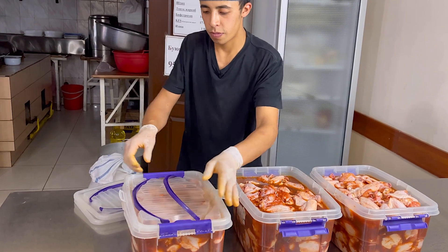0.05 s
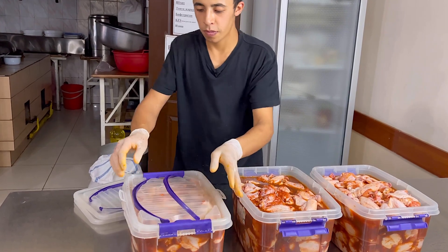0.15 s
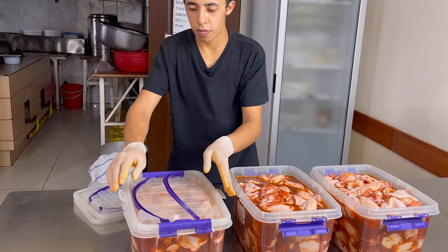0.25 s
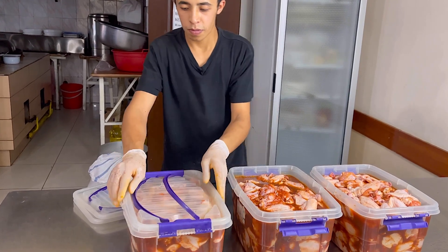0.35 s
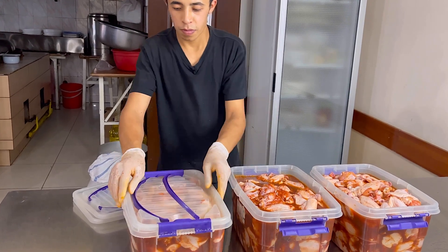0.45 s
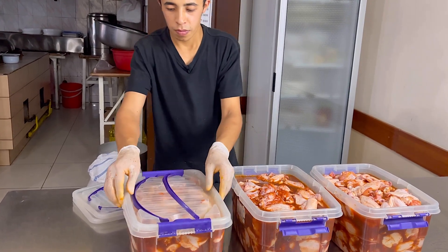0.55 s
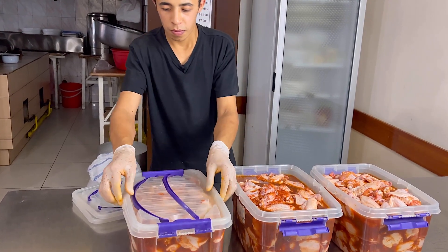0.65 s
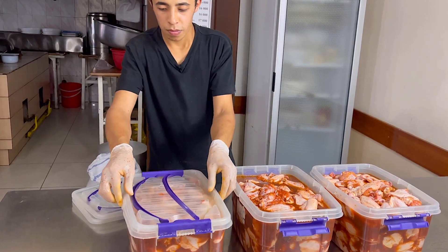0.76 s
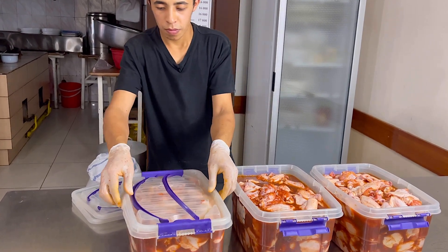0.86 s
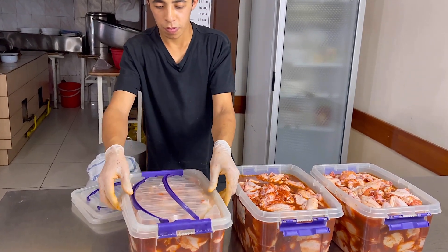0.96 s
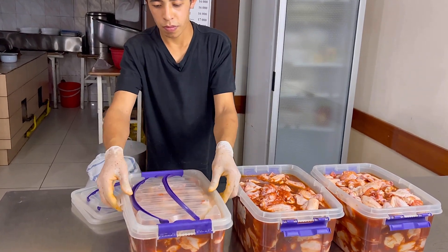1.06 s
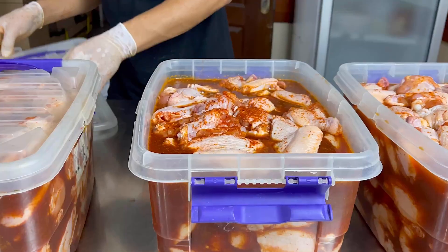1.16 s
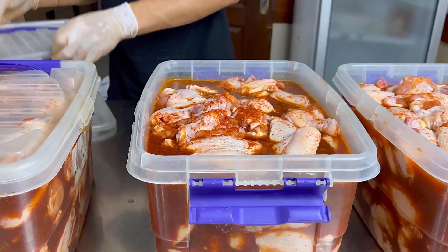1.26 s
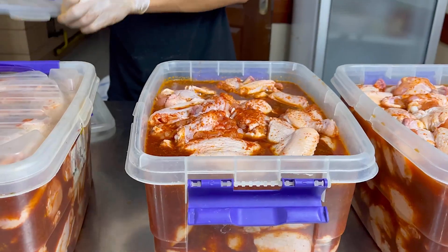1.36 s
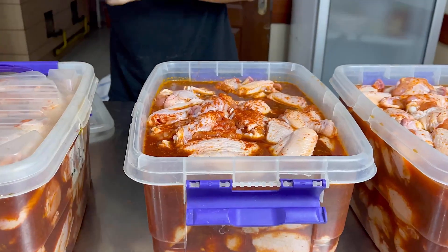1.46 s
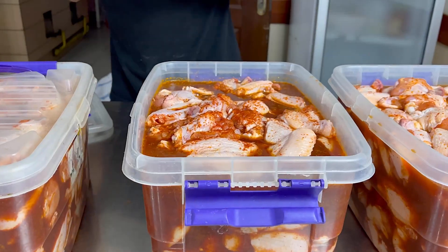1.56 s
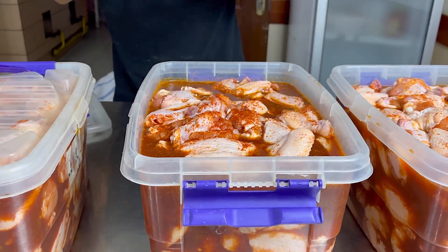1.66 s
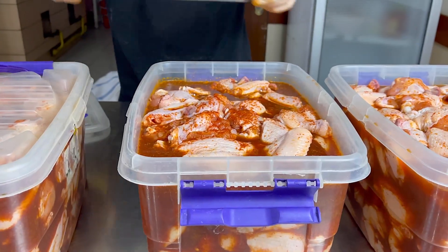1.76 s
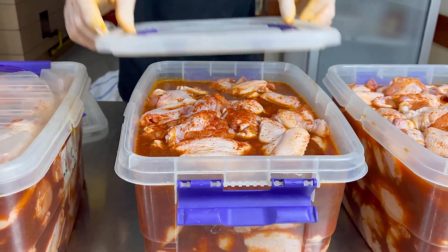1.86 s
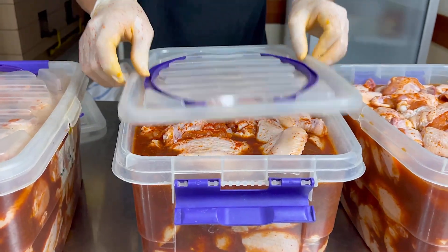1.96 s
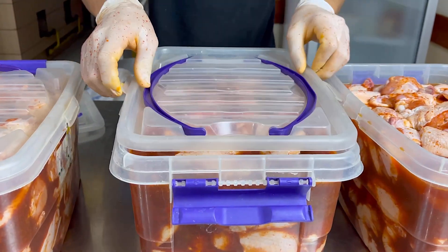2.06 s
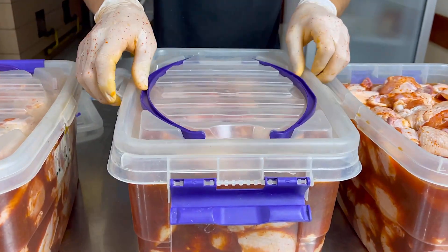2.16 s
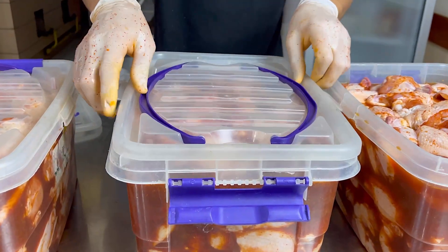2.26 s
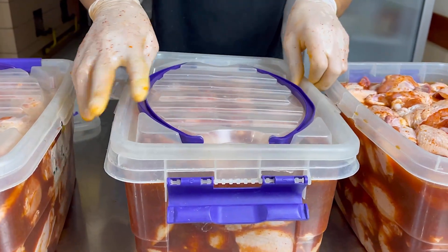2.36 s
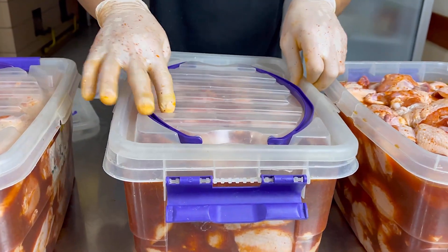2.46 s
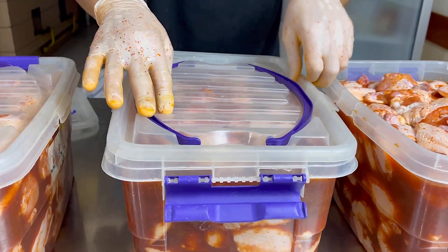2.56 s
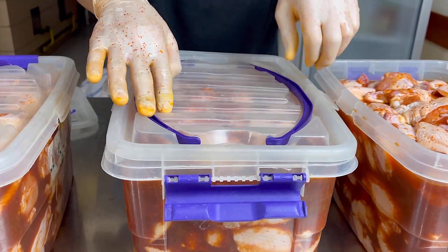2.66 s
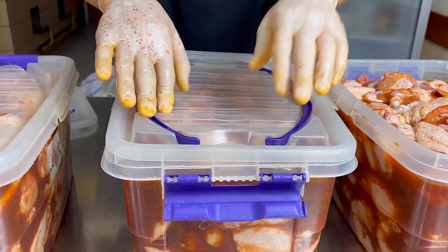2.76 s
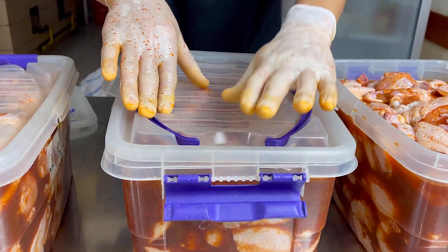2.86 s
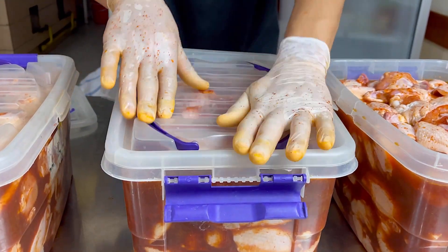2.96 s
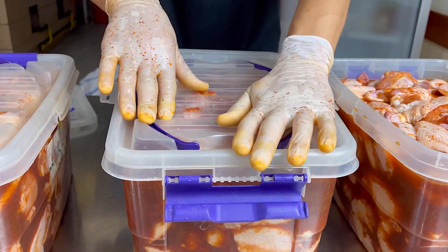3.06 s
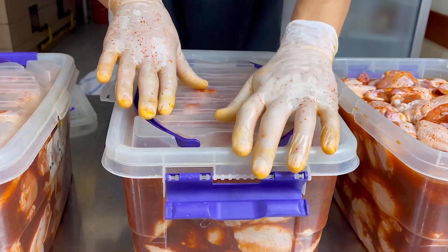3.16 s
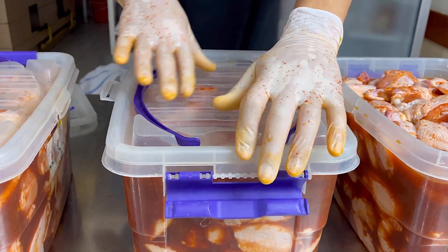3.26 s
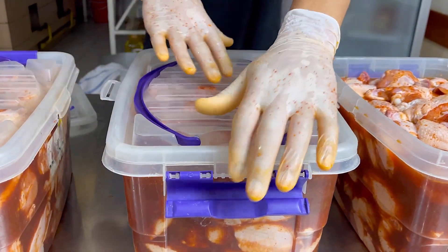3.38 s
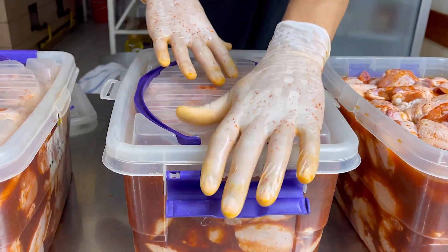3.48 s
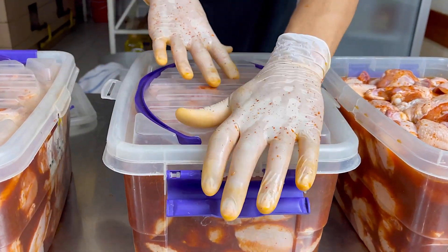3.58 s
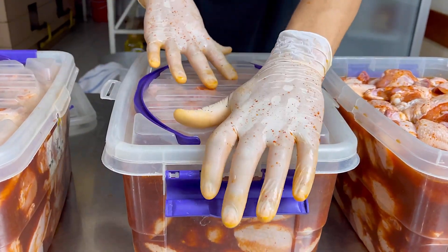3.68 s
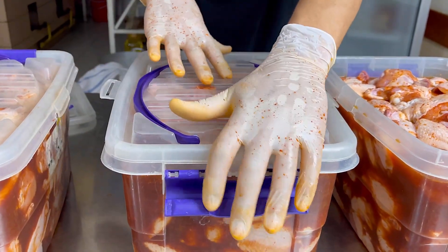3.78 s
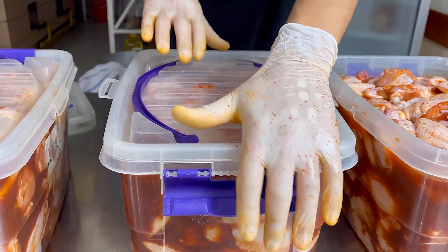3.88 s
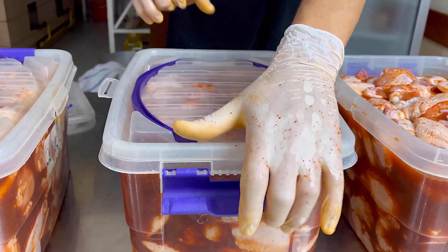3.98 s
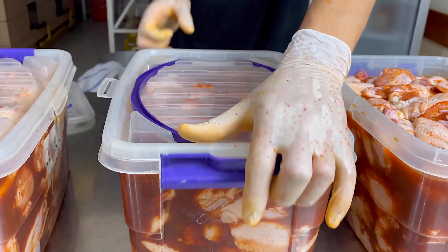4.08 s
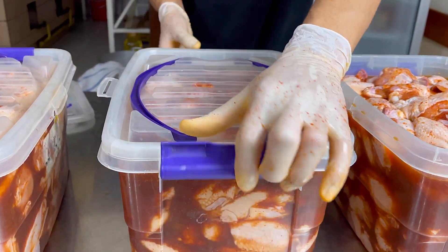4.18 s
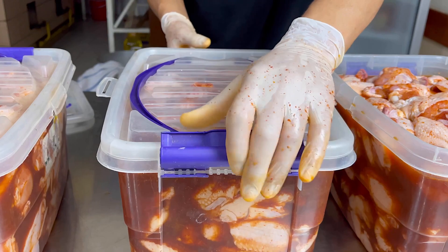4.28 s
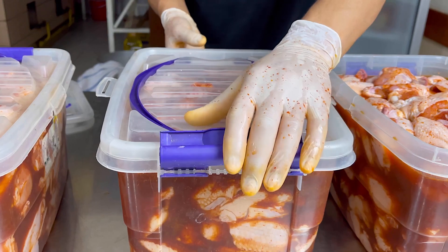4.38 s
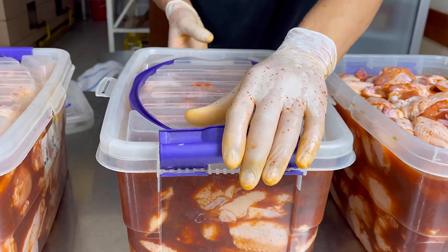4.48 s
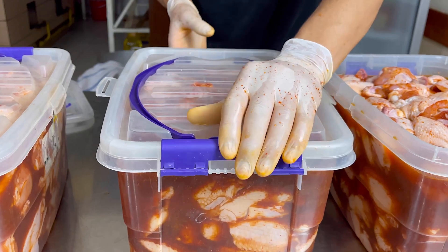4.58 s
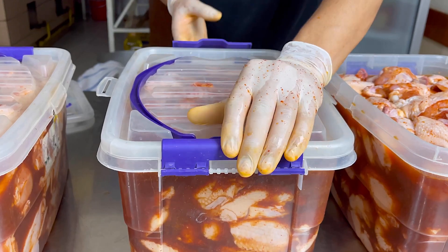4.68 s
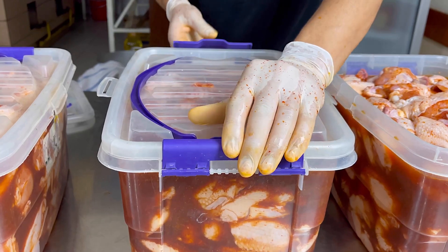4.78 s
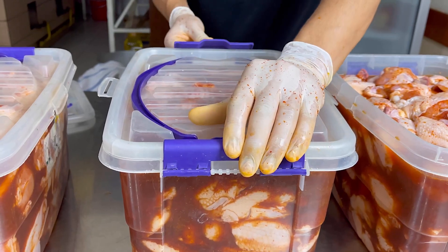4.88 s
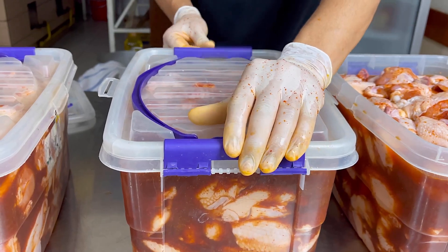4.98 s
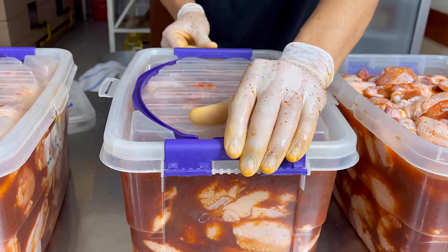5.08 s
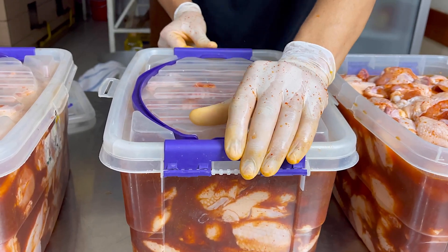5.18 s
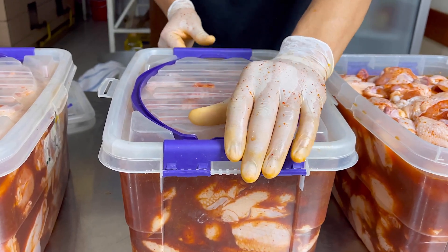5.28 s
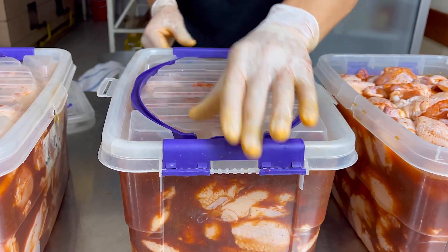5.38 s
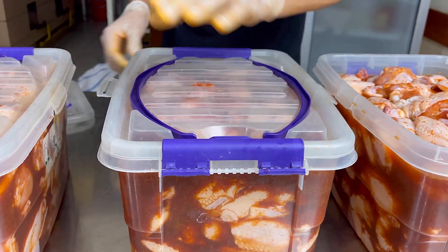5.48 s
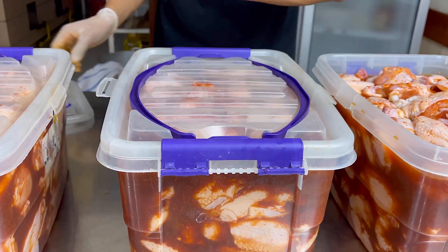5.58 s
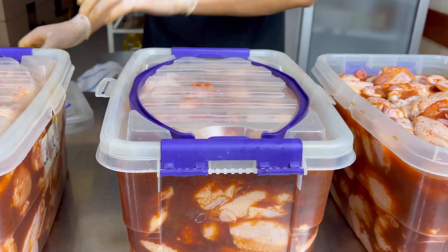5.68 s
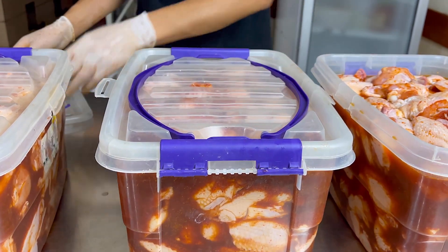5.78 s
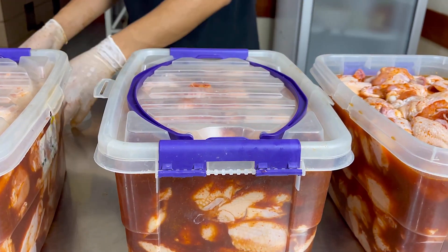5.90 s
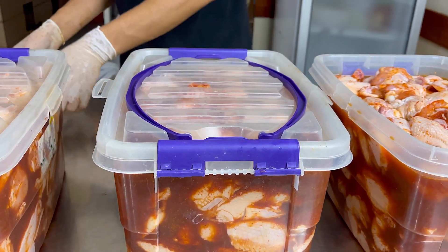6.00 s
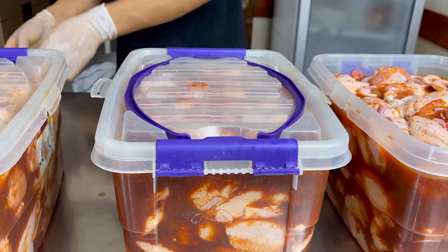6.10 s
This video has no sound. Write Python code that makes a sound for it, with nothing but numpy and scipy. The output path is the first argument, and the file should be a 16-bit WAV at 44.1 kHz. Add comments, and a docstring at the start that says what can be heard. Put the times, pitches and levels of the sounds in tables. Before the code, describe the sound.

Close to the microphone in a hard, echoing kitchen, ventilation rumbles and a fridge hums. Thin gloves crinkle, a box is bumped softly, then a plastic lid clatters down with a low thud and small bounces. It is pressed home with a double knock. Latches click dryly, then two loud cracks snap shut, slightly overloaded. Soft bumps and rubbing follow.

```python
"""In a kitchen, gloved hands drop a plastic lid on a full storage box, press it home and snap two latches shut.
Plastic blows are filtered pulses, decaying noise rattle and ringing modes, echoed by the room.
Gloves are stick-slip noise and fizzing folds; thuds are low decaying noise.
The close cracks overload the microphone. Ventilation noise and a fridge's wavering tones run throughout."""
import sys
import numpy as np
from scipy import signal
from scipy.fft import rfft, irfft
from scipy.io import wavfile

SR = 44100
rng = np.random.default_rng(int(sys.argv[2]) if len(sys.argv) > 2 else 0)


def persist_wave(psi):
    """Save psi, clipped to +-1, as 16-bit WAV."""
    counts = np.round(np.clip(psi, -1, 1) * 32767).astype(np.int16)
    wavfile.write(sys.argv[1], SR, np.atleast_2d(counts).T)


N = 270774
# Time and frequency axes of one short sound
T = np.arange(16384) / SR
HZ = np.fft.rfftfreq(16384, 1 / SR)


# Latches snapping shut. Each row: start in seconds, level in dB, corner in Hz, treble tilt in dB per octave,
# chatter level in dB.
LATCH_SNAPS = [(4.5415, 1.5, 1600, -3.5, -10.5), (4.9603, -1, 2720, -7.5, -28.5)]
# Resonances of a latch on its rim, before the contact filter. Each row: frequency in Hz, level in dB, t60 in seconds.
LATCH_MODES = [(434, -11, 0.34), (588, 6.5, 0.032), (700, 5, 0.023), (850, -5, 0.017), (1066, -16.5, 0.026),
               (1313, -5, 0.072), (1470, 12, 0.019), (1568, 6, 0.049), (1783, -11.5, .06),
               (2057, 4, 0.0395), (2305, -3.5, 0.074), (2495, 4.5, 0.0097), (2874, -3.5, 0.048),
               (3190, -7.5, 0.17), (3850, 2.5, 0.062), (7040, -10.5, 0.1), (7960, -11.5, 0.067)]
# Rattle levels are relative to the clean pulse
CRACK_RATTLE_DB = 10
# Slam into the seat; delay and level relative to the crack
SEAT_DELAY_S, SEAT_REL_DB, SEAT_HZ = .0036, -4.5, 800
SEAT_TILT_DB_PER_OCT, SEAT_RATTLE_DB = -7.5, -3.5
# Lid chattering on the rim, weaker each time
CHATTER_DELAY_S, CHATTER_GAP_S, CHATTER_LOSS_DB = .0118, .0162, 3.5
CHATTER_HZ, CHATTER_TILT_DB_PER_OCT, CHATTER_RATTLE_DB = 1800, -4.5, 0


def latch_snaps(chatter_count=3):
    """A latch cracks over its catch, slams lower into its seat and leaves the lid chattering."""
    cracks, chatter = [], []
    for s, db, corner_hz, tilt_db, chatter_db in LATCH_SNAPS:
        cracks.append((s, db, corner_hz, tilt_db, CRACK_RATTLE_DB))
        cracks.append((s + SEAT_DELAY_S, db + SEAT_REL_DB, SEAT_HZ, SEAT_TILT_DB_PER_OCT, SEAT_RATTLE_DB))
        for k in range(chatter_count):
            tap_s = s + CHATTER_DELAY_S + k * CHATTER_GAP_S
            tap_db = chatter_db - k * CHATTER_LOSS_DB
            chatter.append((tap_s, tap_db, CHATTER_HZ, CHATTER_TILT_DB_PER_OCT, CHATTER_RATTLE_DB))
    return (blows(cracks, LATCH_MODES, rattle_t60_s=0.012, ring_db=-4.5, room_db=-11.0, ring_room_db=-5)
            + blows(chatter, LATCH_MODES, rattle_t60_s=.035, ring_db=-5, room_db=-1.0, ring_room_db=-2))


# Latches swinging on their hinges and tapping the rim. Each row: start in seconds, level in dB, corner in Hz,
# treble tilt in dB per octave, rattle in dB relative to the pulse.
LATCH_CLICKS = [(3.549, -28, 1970, -5, 12), (3.7016, -9.5, 2210, -5, 2.5), (3.7065, -21.5, 697, -2.5, 1),
                (4.2099, -24, 4170, -11, 21), (4.2103, -10.5, 1620, -34.5, -11),
                (4.507, -31.5, 4480, 10, 0.5), (4.537, -21.5, 1175, -8, 9), (4.646, -14.5, 1715, -14, -4)]


def latch_clicks():
    """A loose latch gives short, dry clicks through the same latch modes."""
    return blows(LATCH_CLICKS, LATCH_MODES, rattle_t60_s=0.014, ring_db=-7, room_db=-14, ring_room_db=-8)


# Loose lid touching the rim and shifting into place. Each row: start in seconds, level in dB, corner in Hz,
# treble tilt in dB per octave, rattle in dB relative to the pulse.
LID_KNOCKS = [(1.930, -21.5, 603, -11, -3), (1.974, -27.5, 1030, -9, 14), (2.157, -19, 1150, -20, 0),
              (2.176, -24.5, 1800, -7.5, -3), (2.199, -23.5, 1380, -10, 2)]
# Resonances of the loose lid, before the contact filter. Each row: frequency in Hz, level in dB, t60 in seconds.
LID_MODES = [(501, 9, 0.082), (758, -3, 0.09), (844, 2, 0.065), (1280, -6, 0.11), (1800, -50, 0.042),
             (2256, -6, 0.07), (2850, -9, 0.054), (3500, 7, 0.026)]
# First contact of the falling lid
LID_DROP_S, LID_DROP_DB, LID_DROP_HZ = 1.9896, -8, 1720
LID_DROP_TILT_DB_PER_OCT, LID_DROP_RATTLE_DB = -6.5, 13
# Change per bounce: weaker, lower, duller
BOUNCE_GAP_S, BOUNCE_LOSS_DB = .0108, 4
BOUNCE_CORNER_RATIO, BOUNCE_DULLING_DB_PER_OCT = 0.68, 1


def lid(contact_count=4):
    """The lid touches the rim, drops, bounces ever more weakly and is nudged into place."""
    bounces = []
    for k in range(contact_count):
        s = LID_DROP_S + k * BOUNCE_GAP_S
        db = LID_DROP_DB - k * BOUNCE_LOSS_DB
        corner_hz = LID_DROP_HZ * BOUNCE_CORNER_RATIO ** k
        tilt_db = LID_DROP_TILT_DB_PER_OCT - k * BOUNCE_DULLING_DB_PER_OCT
        bounces.append((s, db, corner_hz, tilt_db, LID_DROP_RATTLE_DB))
    return (blows(bounces, LID_MODES, rattle_t60_s=0.053, ring_db=2.0, room_db=-13, ring_room_db=-2.5)
            + blows(LID_KNOCKS, LID_MODES, rattle_t60_s=0.043, ring_db=-5, room_db=-8.5, ring_room_db=-2))


# Covered boxes pressed and bumped. Each row: start in seconds, level in dB, corner in Hz,
# treble tilt in dB per octave, rattle in dB relative to the pulse.
BOX_KNOCKS = [ (1.0775, -27, 800, -2.5, 9), (1.095, -30, 900, -6, 22), (1.144, -37.5, 1100, -16, 7),
              (2.6382, -12.5, 1020, -3, 2), (2.6497, -14.5, 1500, -6.5, 5.5),
              (2.925, -28.5, 600, -4.5, -1.5), (2.956, -23, 1290, -7, 1), (2.968, -30.5, 1190, -16, 0.5),
              (5.868, -28, 1500, -12, 20), (5.873, -26, 1900, -9, 3), (5.894, -25.5, 1460, -10, 7),
              (5.970, -31.5, 1390, -8, 4), (5.997, -29, 3800, -13, -8), (6.019, -27.5, 3200, -11, -1),
              (6.035, -32.5, 900, -9, -5)]
# Resonances of the covered box, before the contact filter. Each row: frequency in Hz, level in dB, t60 in seconds.
BOX_MODES = [(288, -15, 0.068), (363, 7, 0.063), (442, -1, 0.11), (636, -8, 0.079), (678, 4, 0.057),
             (795, -10, 0.033), (870, 2.5, 0.036), (1040, -30, 0.035), (1253, -12, 0.16), (1396, -17, 0.15),
             (1800, -10, 0.088), (7350, 7, 0.0031), (8960, 6, 0.0037)]


def boxes():
    """Hands press the rim home and knock against the covered boxes, ringing the box modes."""
    return blows(BOX_KNOCKS, BOX_MODES, rattle_t60_s=0.014, ring_db=-2.5, room_db=-14, ring_room_db=0)


# Filter shape of plastic, for blows and rubs. Each row: frequency in Hz, relative gain in dB.
PLASTIC_GAIN = [(100, 6.5), (1000, 4.5), (2000, 4.5), (3200, 3), (5000, 1), (8000, 4.5), (10500, 0),
                (14000, -2), (16000, -10.5)]


def blows(rows, modes, rattle_t60_s, ring_db, room_db, ring_room_db):
    """Each blow is a sharp pulse, a dense rattle of the thin walls and ringing modes, echoed by the room."""
    out = np.zeros(N)
    for s, db, corner_hz, tilt_db, rattle_db in rows:
        spectrum_db = contact(corner_hz, tilt_db, PLASTIC_GAIN)
        pulse = burst(colour(T == 0, spectrum_db))
        noise = rng.standard_normal(len(T)) * dying(rattle_t60_s)
        rattle = burst(colour(noise, spectrum_db))
        ring = np.zeros(len(T))
        for k, (hz, mode_db, t60_s) in enumerate(modes):
            # the contact decides which modes speak; the pressing hand detunes them a little
            gain = (-1) ** k * amp(mode_db + np.interp(hz, HZ, spectrum_db))
            detuned_hz = hz * (1 + 0.0047 * rng.normal())
            ring += gain * dying(t60_s) * np.sin(2 * np.pi * detuned_hz * T)
        ring = amp(ring_db) * burst(ring)
        direct = burst(pulse + amp(rattle_db) * rattle) + ring
        add(out, s, amp(db) * direct)
        # the room gathers all sides of the box, which evens out the rattle: only pulse and ring feed it
        to_room = pulse + amp(ring_room_db) * ring
        add(out, s, amp(db + room_db) * signal.fftconvolve(to_room, reflections()))
    return out


def contact(corner_hz, tilt_db_per_oct, material):
    """Gain in dB: a small patch radiates little bass; a softer contact loses more treble above its corner."""
    bass_db = -10 * np.log10(1 + (corner_hz / 2 / (HZ + 1)) ** 4.73)
    treble_db = tilt_db_per_oct * np.log2(np.hypot(1, HZ / corner_hz))
    return bass_db + treble_db + read(material, HZ)


# Gloves sliding on plastic. Each row: peak time in seconds, level in dB before the stroke envelope,
# rise and fall time constants in seconds, corner in Hz, treble tilt in dB per octave.
RUBS = [(.02, -52.5, 0.055, 0.04, 2000, -2), (1.081, -32.5, 0.012, 0.013, 3480, -6),
        (2.16, -28, 0.018, 0.023, 1390, -9), (2.21, -37, .006, 0.0092, 1500, -2.5),
        (2.928, -26.5, 0.01, 0.028, 1080, -11), (2.951, -23.5, 0.011, 0.0041, 2520, -4),
        (3.51, -37.5, 0.012, 0.0097, 2310, -7), (5.891, -28, 0.022, 0.032, 1060, -10.5),
        (6.025, -43, 0.081, 0.04, 1200, -6.5)]


def rubs(grain_db=0.5, slips_per_s=5000):
    """A sliding glove sticks and slips thousands of times a second: sparse random impulses, filtered."""
    out = np.zeros(N)
    for s, db, rise_s, fall_s, corner_hz, tilt_db in RUBS:
        slips = rng.standard_normal(len(T)) * (rng.random(len(T)) < slips_per_s / SR)
        slips *= amp(grain_db * np.minimum(rng.exponential(1, len(T)), 4))
        start_s = max(s - T[-1] / 2, 0)
        after_peak_s = start_s + T - s
        stroke = np.exp(-np.maximum(-after_peak_s / rise_s, after_peak_s / fall_s))
        friction = unit(colour(slips, contact(corner_hz, tilt_db, PLASTIC_GAIN)))
        add(out, start_s, amp(db) * stroke * friction)
    return out


# Thin gloves crinkling, main fold of each flex. Each row: start in seconds, level in dB, corner in Hz.
CRINKLES = [(0.309, -52.5, 6000), (.576, -44, 5030), (.602, -44.5, 4060), (0.858, -43, 4500),
            (.898, -32.5, 4500), (.928, -39.5, 3500), (.943, -42, 3000), (2.287, -49, 5000),
            (2.521, -49.5, 6000), (2.581, -43, 12000), (3.071, -43.5, 3000), (3.171, -43, 11000),
            (3.188, -34.5, 11000), (3.841, -36, 1240), (4.020, -50.5, 6000), (5.252, -41, 4000)]
# Weaker folds flip at random around the main one
SMALL_FOLD_REL_DB, SMALL_FOLD_SPREAD_S = -9, 0.036


def crinkles(small_folds=2):
    """Each flex of a glove flips one main fold and a few small ones."""
    out = np.zeros(N)
    for s, db, corner_hz in CRINKLES:
        add(out, s, amp(db) * fold(corner_hz))
        for offset_s in SMALL_FOLD_SPREAD_S * rng.uniform(-1, 1, small_folds):
            add(out, s + offset_s, amp(db + SMALL_FOLD_REL_DB) * fold(corner_hz))
    return out


# Filter shape of glove film. Each row: frequency in Hz, relative gain in dB.
GLOVE_GAIN = [(1000, 21), (3000, -1.5), (5500, -6.5), (9000, -3), (13500, -5), (16000, -10)]
FOLD_T60_S = 0.019


def fold(corner_hz, snap_db=-4):
    """A fold of glove flips over with a tick and a short fizz."""
    tick = amp(snap_db) * burst(T == 0)
    fizz = burst(rng.standard_normal(len(T)) * dying(FOLD_T60_S))
    return burst(colour(tick + fizz, contact(corner_hz, 0, GLOVE_GAIN)))


# Heavy box thudding on the table. Each row: start in seconds, level in dB before the envelope.
THUDS = [(1.081, -22), (1.991, -12.5), (2.161, -22.5), (2.919, -17.5), (4.544, -21), (4.964, -25.5),
         (5.859, -20)]
# Filter shape of a thud. Each row: frequency in Hz, relative gain in dB.
THUD_GAIN = [(15, -16), (35, -4.5), (80, 0), (140, -8.5), (230, -14.5), (400, -32.5), (1500, -77.5)]
THUD_T60_S = 0.154


def thuds():
    """Dull shudders of the full box and the table: low noise that swells and dies."""
    out = np.zeros(N)
    for s, db in THUDS:
        shudder = unit(colour(rng.standard_normal(len(T)), read(THUD_GAIN, HZ)))
        envelope = dying(THUD_T60_S) * (1 - dying(0.066))
        add(out, s, amp(db) * shudder * envelope)
    return out


# Colour of the kitchen echoes. Each row: frequency in Hz, relative gain in dB.
ROOM_GAIN = [(100, -9.5), (250, 1), (430, 3.5), (1000, -4.5), (1400, -1.5), (1900, -2.5), (3300, -1.5),
             (4300, -3.5), (6000, -3), (7300, -3.5), (8500, -4.5), (16000, 3.5)]
# Reverberation of the kitchen. Each row: frequency in Hz, t60 in seconds.
ROOM_T60 = [(150, 1), (500, 0.65), (1400, 0.77), (3300, 0.77), (5500, 0.62), (7500, .5), (10000, 0.37),
            (15000, 0.29)]


def reflections(delay_s=0.00071, build_s=0.0012):
    """Echoes from hard walls build up, then die away, the high treble soonest; a random tail of unit energy."""
    hz, t, z = signal.stft(rng.standard_normal(32768), SR, nperseg=256)
    decay = np.exp(-np.log(1000) * t / read(ROOM_T60, hz)[:, None])
    z *= amp(read(ROOM_GAIN, hz))[:, None] * decay
    tail = signal.istft(z, SR, nperseg=256)[1]
    since_delay_s = np.maximum(np.arange(len(tail)) / SR - delay_s, 0)
    tail *= 1 - np.exp(-since_delay_s / build_s)
    return tail / np.linalg.norm(tail)


# Ventilation noise shape. Each row: frequency in Hz, relative gain in dB.
AIR_GAIN = [(11, -22.5), (18, 3), (41, -10), (59, -21.5), (102, -20.5), (124, -24), (239, -27), (291, -28),
            (645, -34.5), (786, -34.5), (1270, -41.5), (1600, -40.5), (2010, -47.5), (8070, -62),
            (16000, -65)]
AIR_RMS_DB = -31.5
# Fridge and fan. Each row: centre in Hz, rms level in dB, noise band width in Hz before level compression.
HUM = [(96.2, -46, 1.9), (202, -55, 10.4), (524, -60, 46), (776, -56.5, 23), (1582, -66, 41),
       (8100, -73, 590), (15000, -79, 23.8)]


def machines(waver=0.23):
    """Rumble and hiss of the ventilation, with the wavering tones of a fridge made from bands of noise."""
    hz = np.fft.rfftfreq(N, 1 / SR)
    air = irfft(rfft(rng.standard_normal(N)) * amp(read(AIR_GAIN, hz)), N)
    out = amp(AIR_RMS_DB) * unit(air)
    for tone_hz, db, width_hz in HUM:
        band = 1 / (1 + (2 * (hz - tone_hz) / width_hz) ** 2)
        tone = signal.hilbert(irfft(rfft(rng.standard_normal(N)) * band, N))
        # compressed envelope: the pitch wanders more than the level
        out += amp(db) * unit(abs(tone) ** waver * np.cos(np.angle(tone)))
    return out


def amp(db):
    """Decibels to gain."""
    return 10 ** (np.asarray(db) / 20)


def unit(x):
    """Scales to an rms of 1."""
    return x / np.sqrt(np.mean(x ** 2) + 1e-20)


def burst(x):
    """Scales a short sound to the energy of 5 ms at an rms of 1."""
    return x * np.sqrt(.005 * SR / (np.sum(x ** 2) + 1e-20))


def read(points, hz):
    """Reads a curve on a log-frequency axis."""
    f, value = np.transpose(points)
    return np.interp(np.log(hz + 1), np.log(f), value)


def add(mix, s, sound):
    """Mixes a sound in at a time in seconds."""
    part = mix[max(round(s * SR), 0):][:len(sound)]
    part += sound[:len(part)]


def colour(x, gain_db):
    """Causal minimum-phase filter with the given gain at the frequencies HZ, floored at -100 dB."""
    log_gain = np.log(amp(np.maximum(gain_db, -100)))
    phase = -signal.hilbert(np.r_[log_gain, log_gain[-2:0:-1]]).imag[:len(HZ)]
    return irfft(rfft(x) * np.exp(log_gain + 1j * phase))


def dying(t60_s):
    """Exponential decay, 60 dB in t60_s."""
    return np.exp(-np.log(1000) * T / t60_s)


def scene(glove_room_db=-14):
    """Plastic and gloves close by, the kitchen around them."""
    plastic = lid() + boxes() + latch_clicks() + latch_snaps()
    gloves = rubs() + crinkles()
    glove_echo = amp(glove_room_db) * signal.fftconvolve(gloves, reflections())[:N]
    return (plastic + gloves + glove_echo + thuds() + machines())[None]


CUTOFF_HZ = 15950


def record(dry):
    """The overloaded microphone flattens the loudest cracks at full scale; then a low-pass limits the band."""
    clipped = dry / (1 + dry ** 8) ** (1 / 8)
    low_pass = signal.firwin(511, CUTOFF_HZ, window=("kaiser", 8), fs=SR)
    return signal.oaconvolve(clipped, low_pass[None], "same")


dry = scene()
out = record(dry)
persist_wave(out)
```